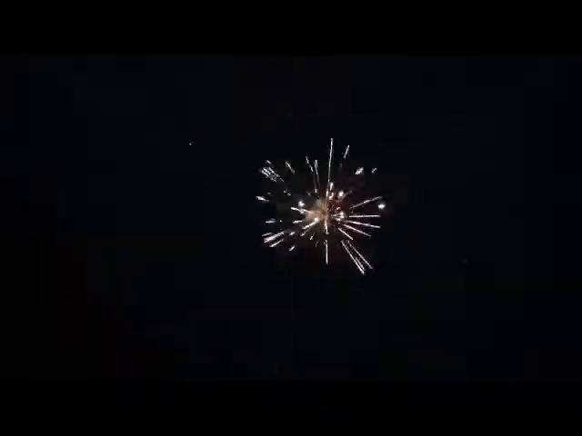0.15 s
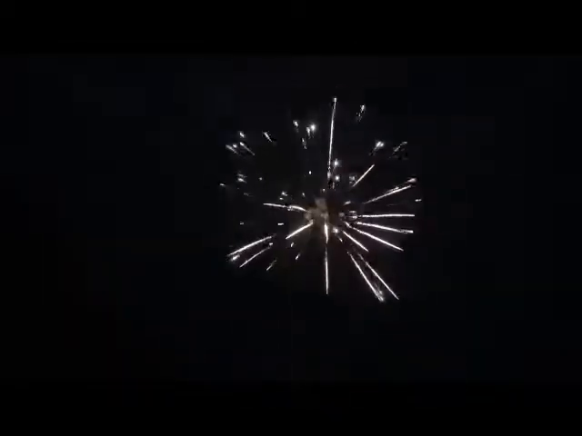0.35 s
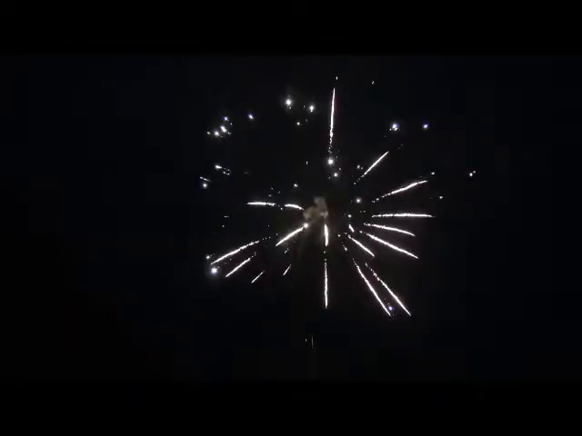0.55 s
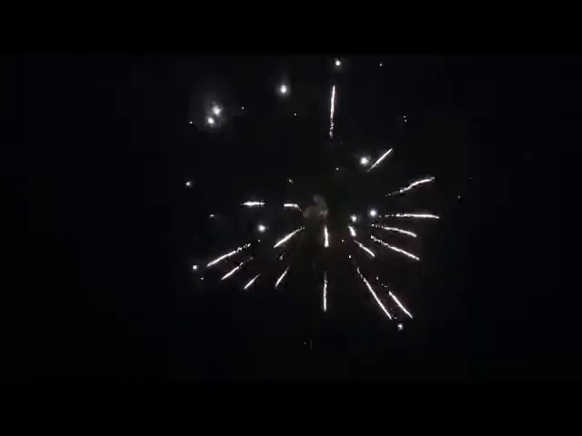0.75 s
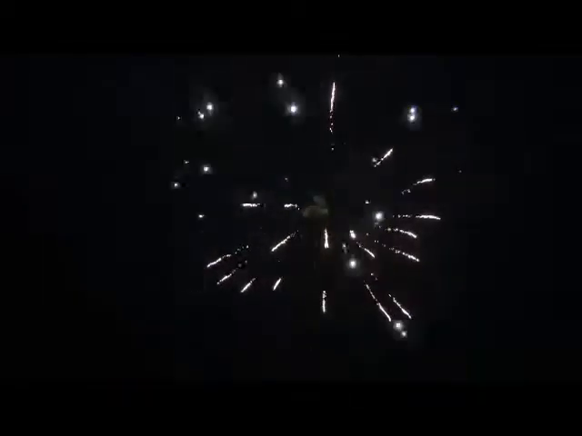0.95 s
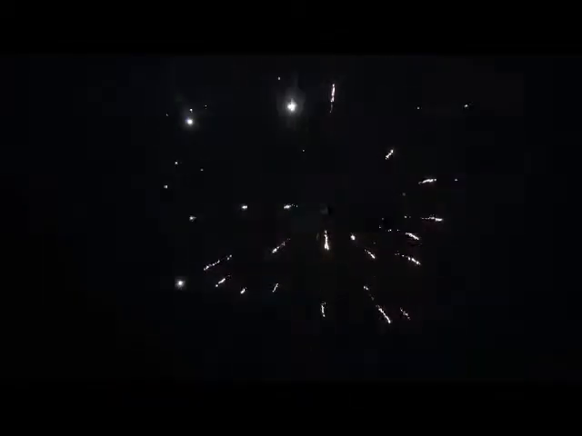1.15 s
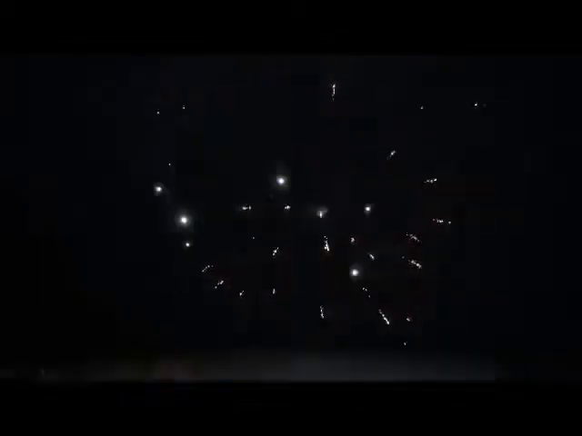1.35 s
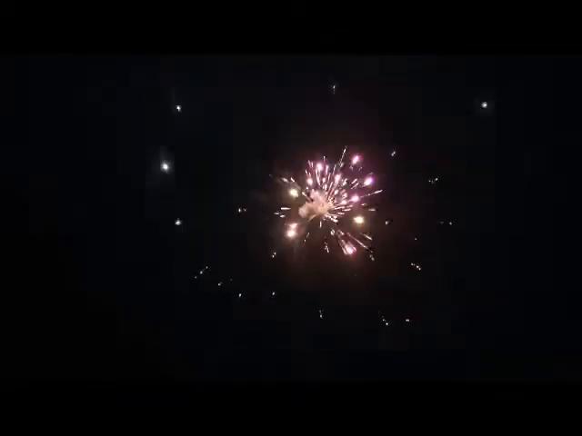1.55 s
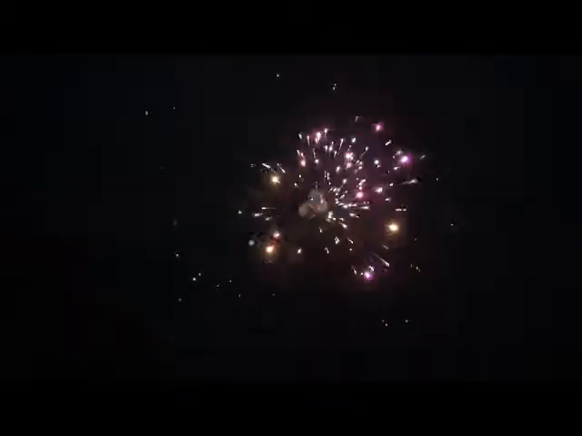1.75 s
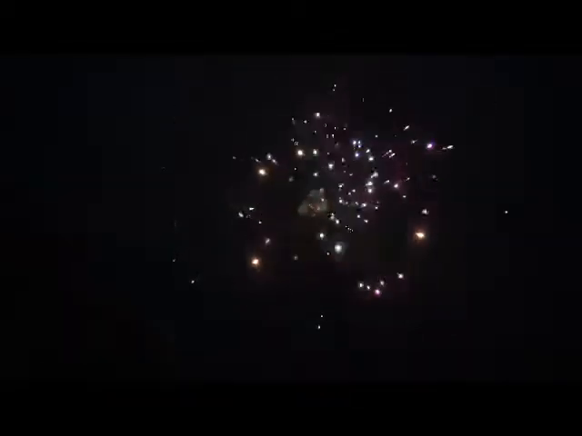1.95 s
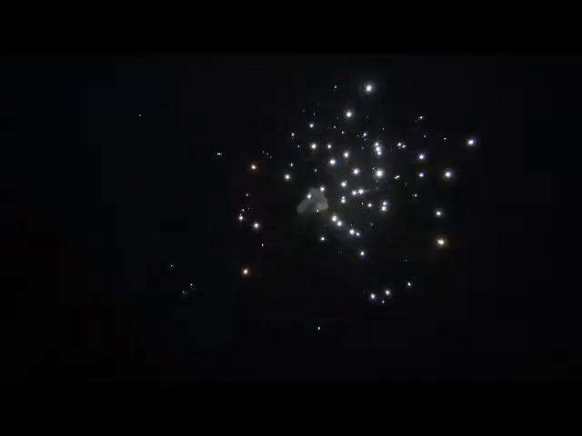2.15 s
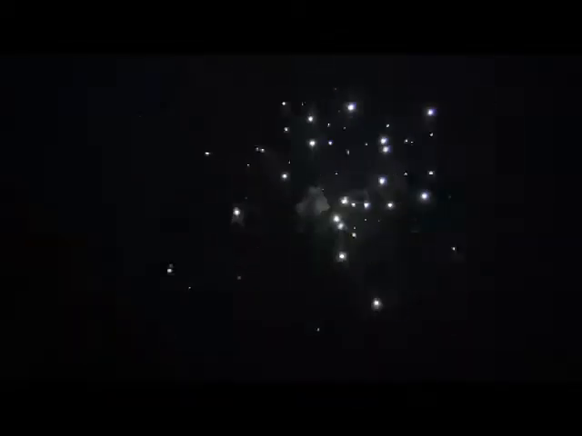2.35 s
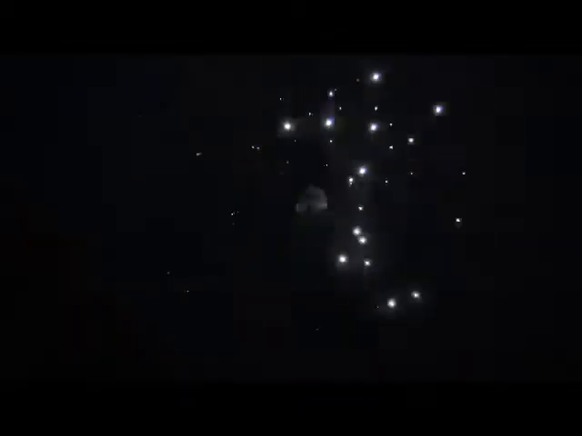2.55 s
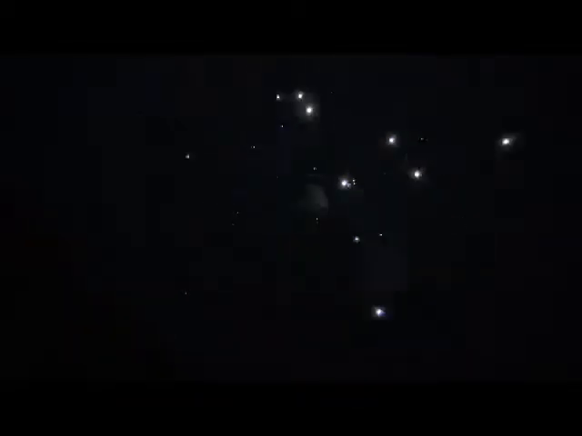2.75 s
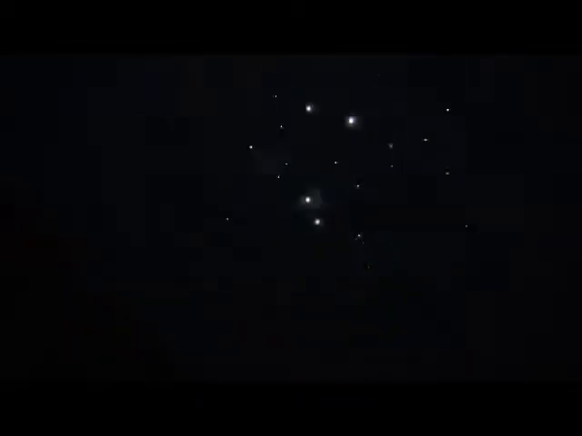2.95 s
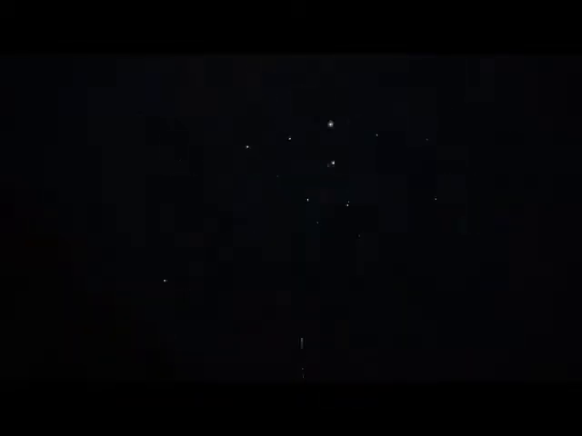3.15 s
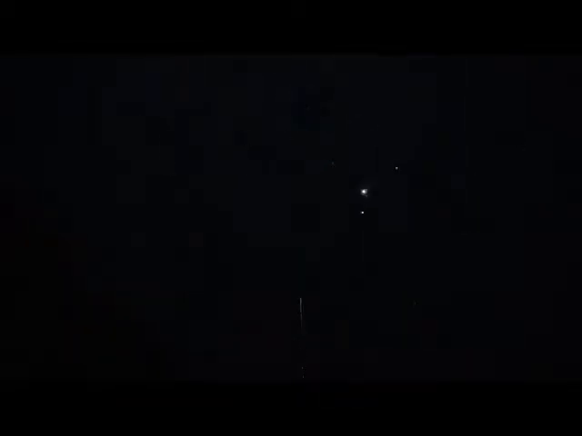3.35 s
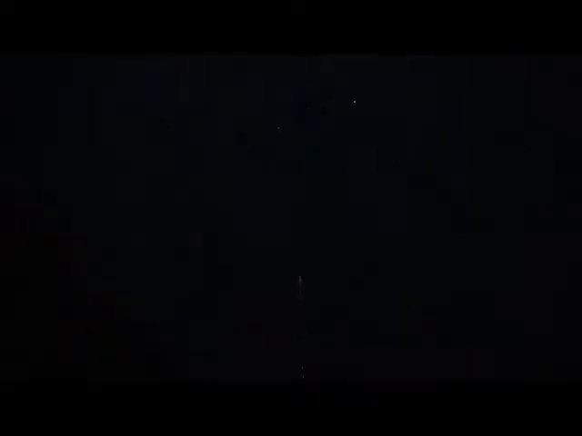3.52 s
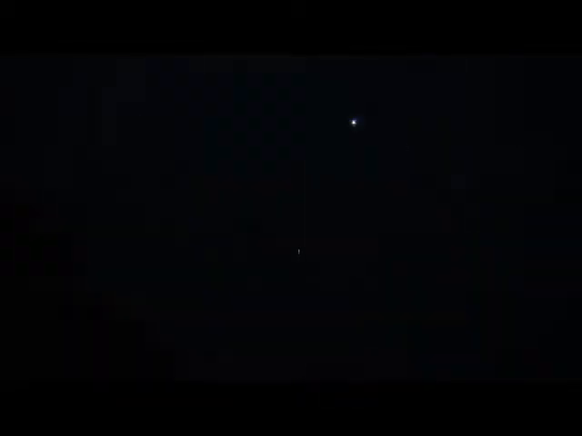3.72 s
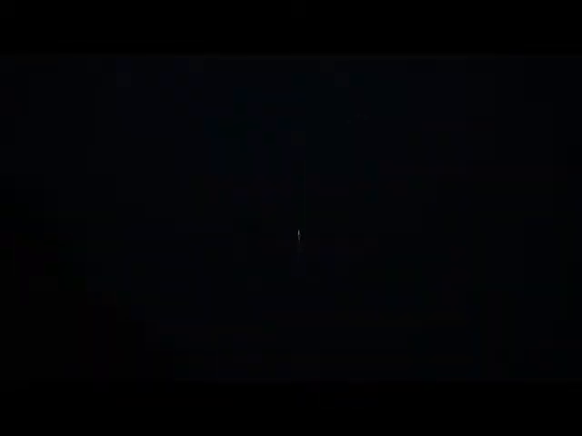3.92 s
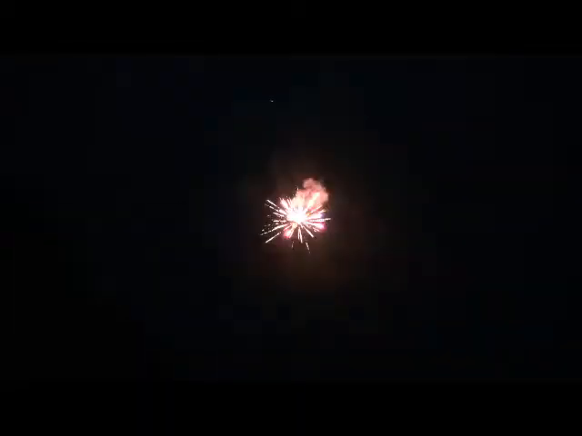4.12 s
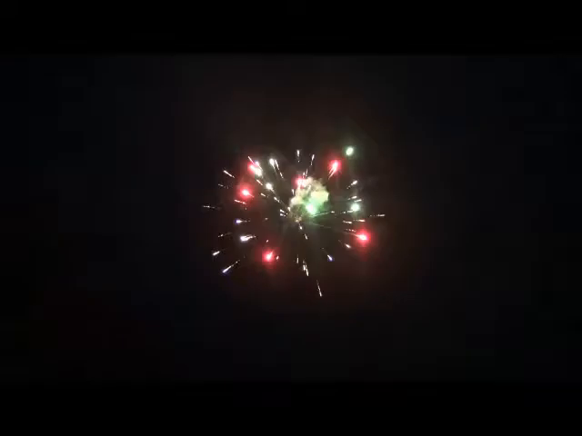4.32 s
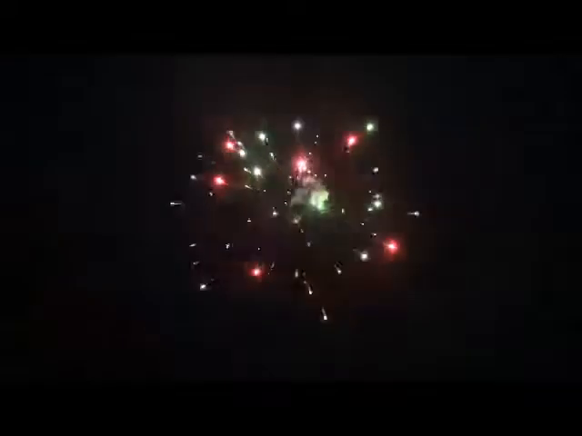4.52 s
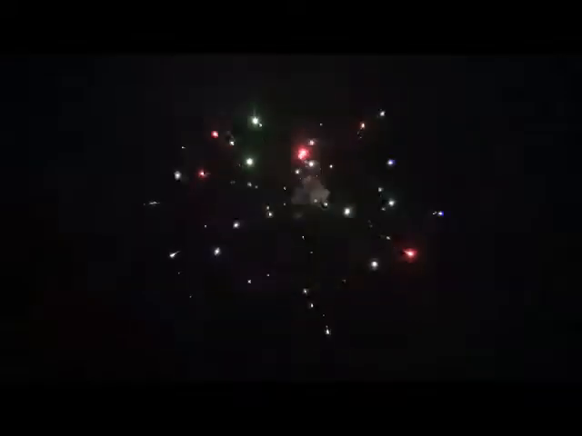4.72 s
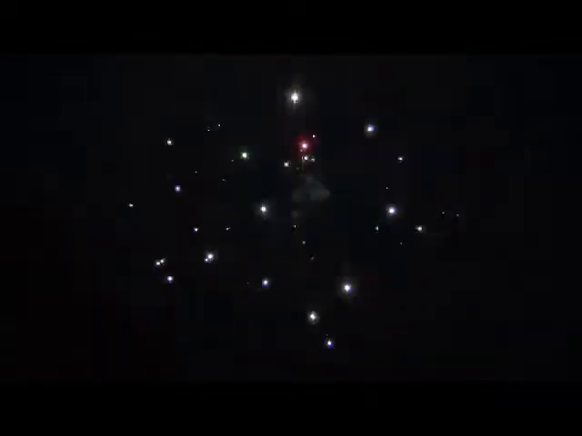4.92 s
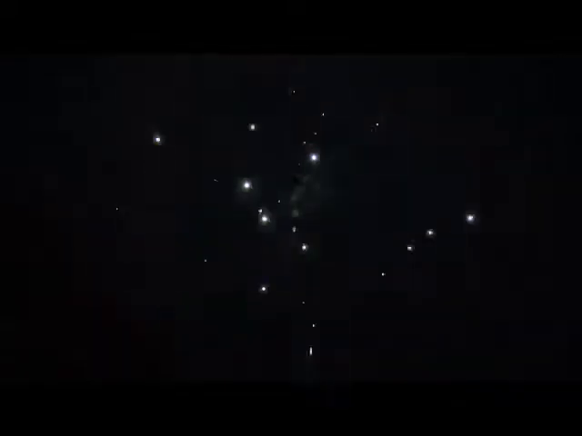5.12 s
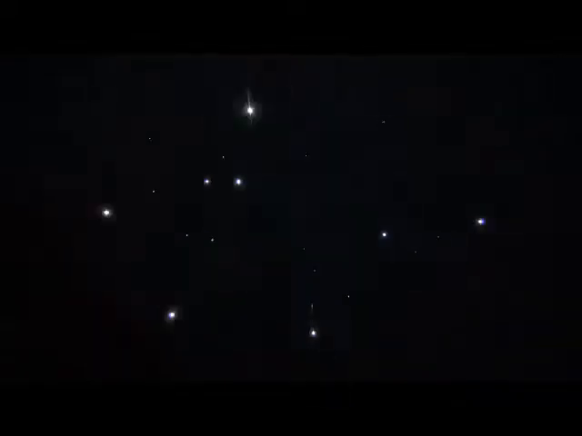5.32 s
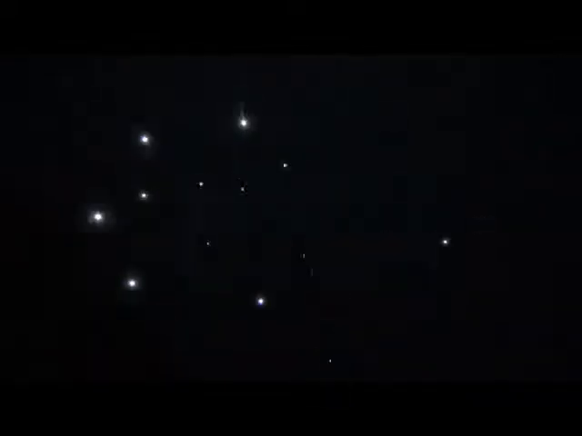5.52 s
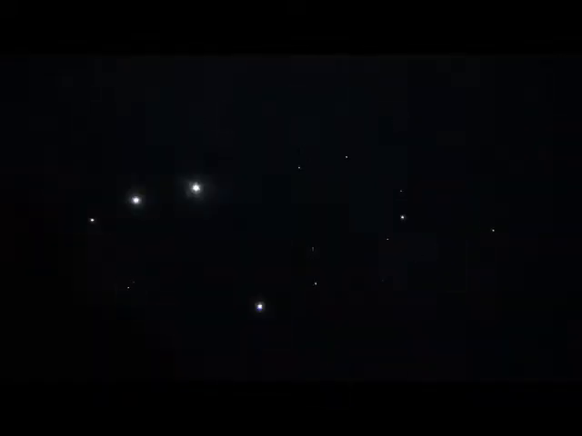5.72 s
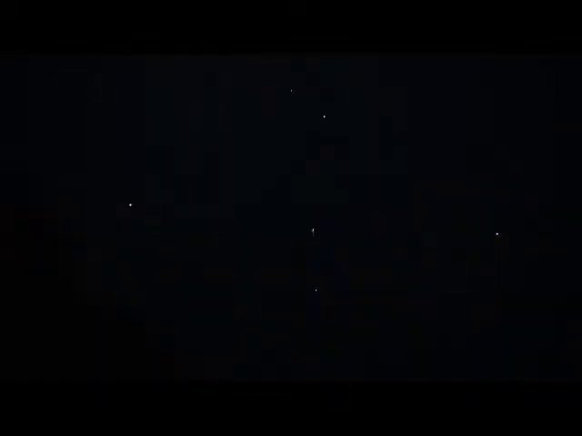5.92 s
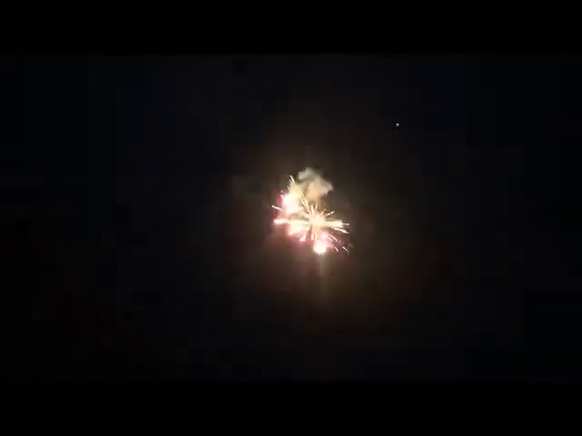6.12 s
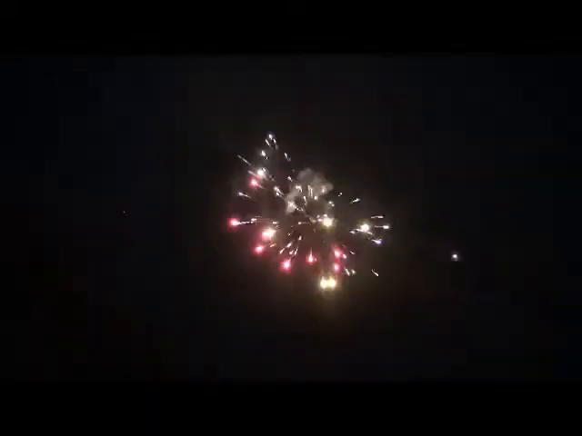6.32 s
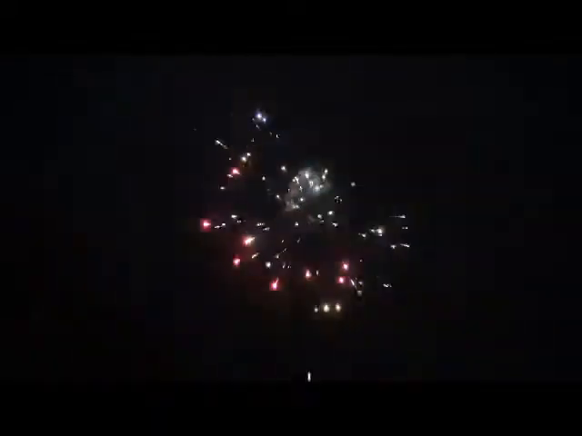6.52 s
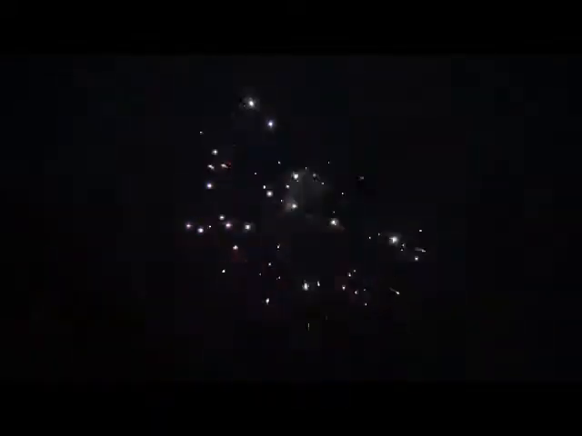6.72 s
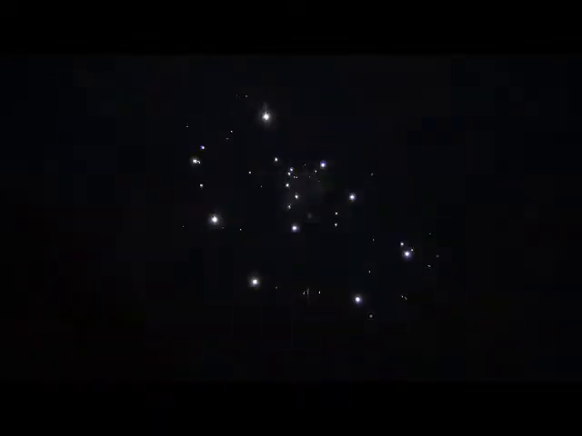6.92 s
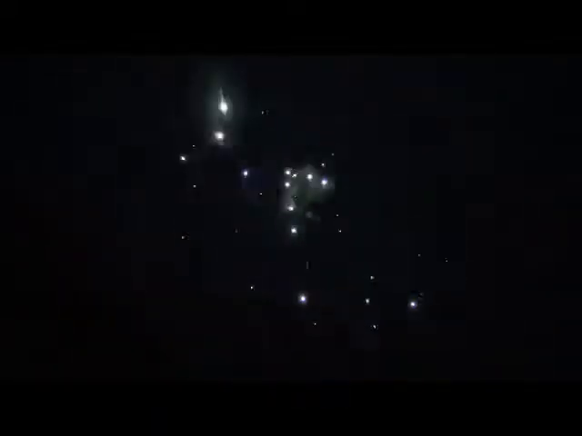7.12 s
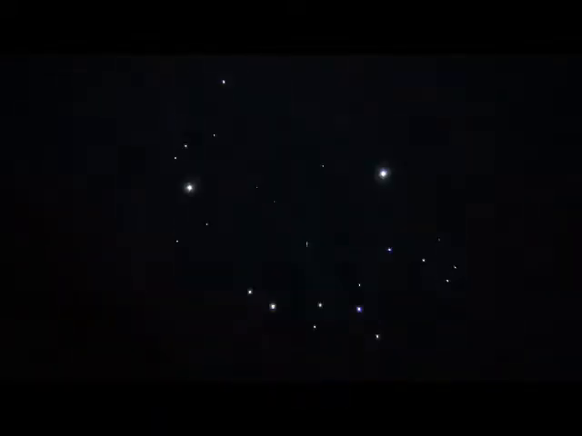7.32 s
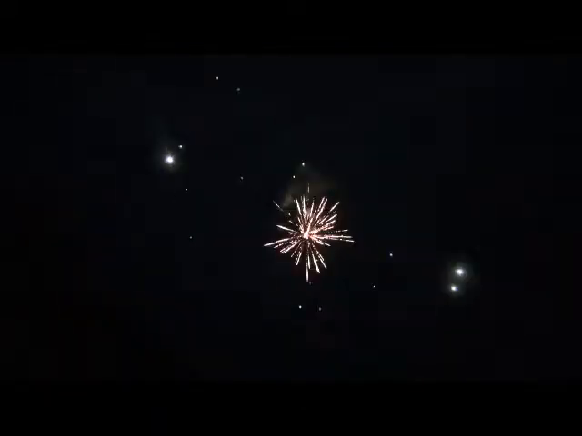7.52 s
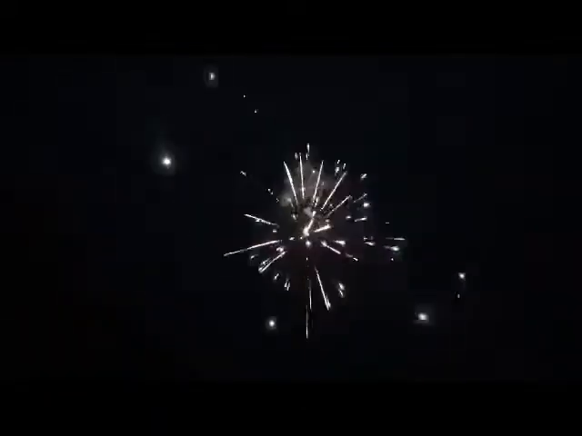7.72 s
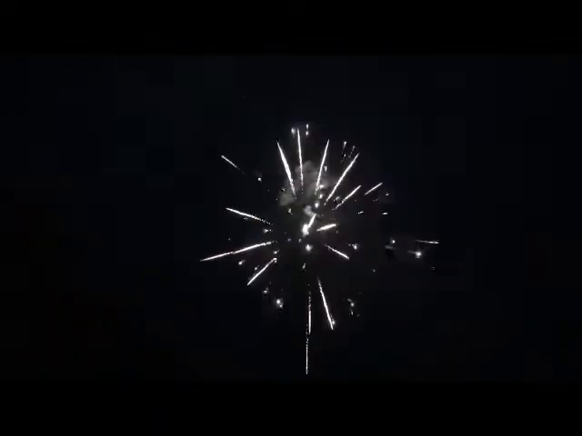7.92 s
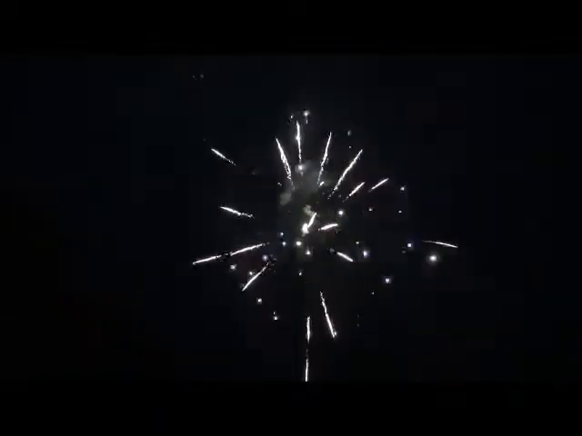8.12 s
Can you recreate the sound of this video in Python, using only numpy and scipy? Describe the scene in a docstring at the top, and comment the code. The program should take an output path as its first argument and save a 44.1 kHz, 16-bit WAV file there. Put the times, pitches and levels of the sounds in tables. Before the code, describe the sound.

Fireworks at night: five heavy overhead bangs and three drier mortar pops, each echoing off trees and houses into a long dulling roll over faint hiss.

```python
"""A quiet outdoor place at night: firework shells burst overhead and a mortar on the ground pops.
Each blast is a sharp pressure wave with its first reflections. Shaped noise makes the splash from
close trees and the long roll from far houses and hills, which the air dulls as it goes on.
Thin ticks and a soft hiss lie beneath. A limiter on each microphone flattens the loudest moments."""
import sys
import numpy as np
from scipy import signal
from scipy.fft import rfft, irfft, next_fast_len
from scipy.io import wavfile
from scipy.ndimage import uniform_filter1d, minimum_filter1d

SR = 44100
rng = np.random.default_rng(int(sys.argv[2]) if len(sys.argv) > 2 else 0)


def persist_wave(psi):
    """Save psi, clipped to +-1, as 16-bit WAV."""
    counts = np.round(np.clip(psi, -1, 1) * 32767).astype(np.int16)
    wavfile.write(sys.argv[1], SR, np.atleast_2d(counts).T)


N = 364266
TAIL = int(2.6 * SR)  # length of one explosion with its echoes, in samples
WAVE_SIZE = 4096  # length of a blast wave or a tick, in samples

# how strongly noise differs between the microphones, against what they share: (f/Hz, level/dB)
MICROPHONE_DIFFERENCE = [(200, -32), (2200, -19), (3500, -21.5), (5200, -4), (8000, 1.5), (10000, -3),
                         (11500, -20)]


def undb(db):
    """Turn decibels into gain."""
    return 10 ** (np.asarray(db) / 20)


def rfft_hz(size):
    """Frequency of each bin of a transform."""
    return np.arange(size // 2 + 1) * SR / size


def gains(colour, size):
    """Gain of a (f/Hz, level/dB) colour at each bin, joined by straight lines over log frequency."""
    hz, db = np.transpose(colour)
    bin_db = np.interp(np.log(rfft_hz(size) + 1), np.log(hz), db)
    return undb(bin_db)


def tint(x, colour):
    """Give a sound a colour by scaling each of its frequencies."""
    size = next_fast_len(len(x))
    spectrum = rfft(x, size) * gains(colour, size)
    return irfft(spectrum, size)[:len(x)]


def unit(x):
    """Scale to an rms of 1."""
    return x / np.std(x)


def lowpass(x, hz, order=2):
    """Dull a sound above hz, as a soft surface does."""
    sos = signal.butter(order, min(hz, .45 * SR), fs=SR, output="sos")
    return signal.sosfilt(sos, x)


def add(out, x, s):
    """Mix x into out from time s, cutting what falls outside."""
    start = int(round(s * SR))
    lo = max(start, 0)
    hi = min(start + x.shape[-1], out.shape[-1])
    if hi > lo:
        out[..., lo:hi] += x[..., lo - start:hi - start]


def lean(pair, share):
    """Tip a stereo sound towards the right: half the difference off the left, half onto the right."""
    # how much louder the right microphone is at a share of 1: (f/Hz, level/dB)
    right_lead = [(60, -.3), (130, .7), (260, 3), (550, 3.8), (1200, 3.3), (2500, 1.8), (5000, 2.2),
                  (9000, .4)]
    tipped = []
    for x, sign in zip(pair, (-1, 1)):
        colour = [(hz, sign * share * db / 2) for hz, db in right_lead]
        tipped.append(tint(x, colour))
    return np.array(tipped)


def night():
    """Night air and microphone hiss: steady coloured noise, partly different in each microphone."""
    # colour of the hiss: (f/Hz, level/dB)
    hiss_colour = [(25, -32), (90, -17), (200, -1.5), (480, 1.5), (1400, -8), (3000, -26), (6000, -35),
                   (11000, -40.5), (12000, -29), (15500, -36)]
    level_db = -53.5  # rms of the shared part, before the lean
    mid = unit(tint(rng.standard_normal(N), hiss_colour))
    side = unit(tint(rng.standard_normal(N), hiss_colour))
    side = tint(side, MICROPHONE_DIFFERENCE)
    return undb(level_db) * lean([mid + side, mid - side], share=.3)


def ticks(fade_s=.0008):
    """Tiny high snaps: noise with its bass thinned out that dies away within a few ms."""
    # thin ticks: (t/s, level/dB)
    tick_times = [(2.1130, -41), (2.1245, -43), (2.7990, -31), (2.8112, -24), (3.492, -49), (4.8670, -37)]
    out = np.zeros(N)
    t = np.arange(WAVE_SIZE) / SR
    for s, db in tick_times:
        thin_noise = np.diff(rng.standard_normal(WAVE_SIZE + 1))  # differences favour the treble
        snap = thin_noise * np.exp(-t / fade_s)
        add(out, undb(db) * snap / 2, s)
    return out


def shock(colour):
    """A pressure wave with its energy packed towards the front (minimum phase), peak 1."""
    cepstrum = irfft(np.log(gains(colour, WAVE_SIZE)))
    # fold the second half onto the first, so that nothing sounds ahead of the front
    cepstrum[1:WAVE_SIZE // 2] *= 2
    cepstrum[WAVE_SIZE // 2 + 1:] = 0
    wave = irfft(np.exp(rfft(cepstrum)))
    return -wave / np.abs(wave).max()


def swing(x, turn_hz):
    """An all-pass: the sharp front comes first, the bass swings in behind it the other way."""
    g = np.tan(np.pi * turn_hz / SR)
    pole = (1 - g) / (1 + g)
    return signal.lfilter([pole, -1], [1, -pole], x)


def tube(wave):
    """The blast rings the mortar tube: a low boom and a hollow knock added to the wave."""
    # resonances of the mortar tube: (f/Hz, width/Hz, level/dB)
    resonances = [(147.7, 47, 7.5), (864, 260, -9)]
    ringing = wave.copy()
    for hz, width_hz, db in resonances:
        b, a = signal.iirpeak(hz, hz / width_hz, fs=SR)
        ringing += undb(db) * signal.lfilter(b, a, wave)
    return ringing


def reflect(wave, paths):
    """The shock and its first reflections off ground and walls; soft surfaces dull it."""
    out = np.zeros(TAIL)
    for delay_s, db, edge_hz in paths:
        add(out, undb(db) * lowpass(wave, edge_hz), delay_s)
    return out


def wander(per_s):
    """Random levels joined by straight lines, per_s new ones a second."""
    t = np.arange(TAIL) / SR
    return np.interp(t * per_s, np.arange(TAIL), rng.standard_normal(TAIL))


def scatter(colour, lumpy_db, lumps_per_s, surge_db=1.14, surges_per_s=22):
    """Countless small echoes: noise in lumps and surges, most different between microphones up high."""
    level_db = lumpy_db * wander(lumps_per_s) + surge_db * wander(surges_per_s)
    strength = undb(level_db)
    mid = unit(tint(strength * rng.standard_normal(TAIL), colour))
    side = unit(tint(strength * rng.standard_normal(TAIL), colour))
    side = tint(side, MICROPHONE_DIFFERENCE)
    return np.array([mid + side, mid - side])


def air(x, loss_db=14, knee_hz=5000, power=2.2):
    """Air takes loss_db a second at the knee and more above it, so late echoes are dull."""
    hz, s, frames = signal.stft(x, SR, nperseg=WAVE_SIZE // 8)
    lost_db = loss_db * np.outer((hz / knee_hz) ** power, s)
    return signal.istft(frames * undb(-lost_db), SR)[1][:, :TAIL]


def swell(db, rise_s, hold_s, fade_db_per_s):
    """Diffuse echoes build as the blast reaches more surfaces, hold, then fade at a steady rate."""
    t = np.arange(TAIL) / SR
    rise = np.sqrt(np.minimum(t / rise_s, 1))
    fading_s = np.maximum(t - rise_s - hold_s, 0)
    return rise * undb(db - fade_db_per_s * fading_s)


def with_echoes(diffuse, echoes, linger=1.9):
    """Each large reflector adds energy: a swell that dies away linger times slower than it builds."""
    t = np.arange(TAIL) / SR
    power = diffuse ** 2
    for delay_s, db, spread_s in echoes:
        width_s = np.where(t < delay_s, spread_s, linger * spread_s)
        echo = undb(db) * np.exp(-((t - delay_s) / width_s) ** 2 / 2)
        power = power + echo ** 2
    return np.sqrt(power)


def bang(event, direct, splash_colour, roll_colour, splash_gain, roll_gain, rightward, bass_hz=330):
    """One explosion: blast, bright splash from close by, long roll from far away on the right."""
    _, blast_db, splash_db, roll_db, bass_db = event
    boom_s = .34  # how long the extra bass of a big charge lasts
    t = np.arange(TAIL) / SR
    splash = splash_gain * scatter(splash_colour, lumpy_db=2.0, lumps_per_s=900)
    roll = roll_gain * air(scatter(roll_colour, lumpy_db=1.4, lumps_per_s=600))
    # a bigger charge booms more in the early echoes from the houses, nearly alike in both microphones
    boom_fade = np.sqrt(np.maximum(1 - (t / boom_s) ** 2, 0))
    boom = (undb(bass_db) - 1) * boom_fade * lowpass(roll, bass_hz, order=1)
    near = undb(blast_db) * direct + undb(splash_db) * splash + boom
    far = undb(roll_db) * roll
    return lean(near, rightward) + lean(far, 0.95)


def lifts():
    """The mortar pops at ground level: a dry double knock, then mostly the answer of the houses."""
    # mortar pops: (t/s, blast level/dB, splash level/dB, roll level/dB, extra bass level/dB)
    pops = [(2.7791, 4.5, 1.5, .5, 1), (4.8346, -1, -4, -4.5, 0), (7.9997, 1.5, -1, 0, 0)]
    # ways from the mortar to the microphone: (delay t/s, level/dB, treble edge f/Hz)
    paths = [(0, 3, 8000), (0.0114, 4.5, 3500), (0.029, -1, 600), (.0685, -9, 5010)]
    # colours of the blast, the splash, and the roll before the air dulls it: (f/Hz, level/dB)
    wave_colour = [(25, -19), (60, -5), (130, 0.5), (220, 2), (400, -13), (850, 8), (1500, -4), (3000, -18),
                   (5500, -16), (8000, -40), (15000, -50)]
    splash_colour = [(25, -28), (130, -2), (400, -5), (900, -1), (2000, 0), (3500, -9.5), (5500, -15),
                     (8000, -27), (11000, -26), (12500, -20.5), (15500, -33)]
    roll_colour = [(25, -35), (110, -15), (400, -4.5), (750, 0.5), (1500, -5.5), (2000, -5.5),
                   (2900, -17.5), (4500, -22), (8000, -38), (15000, -26)]
    # echoes from close trees, and from rows of houses: (delay t/s, level/dB, spread t/s)
    trees = [(.072, -36, .014)]
    houses = [(.29, -32.5, .052), (.56, -42, .1)]
    out = np.zeros((2, N))
    wave = tube(swing(shock(wave_colour), turn_hz=970))
    blast = undb(-15) * reflect(wave, paths)
    splash = with_echoes(swell(db=-35, rise_s=.004, hold_s=.005, fade_db_per_s=100), trees)
    roll = with_echoes(swell(db=-40.5, rise_s=.07, hold_s=.15, fade_db_per_s=17), houses)
    for event in pops:
        pop = bang(event, blast, splash_colour, roll_colour, splash, roll, rightward=0.57)
        add(out, pop, event[0])
    return out


def bursts():
    """Shells burst overhead: the whole landscape hears them, so the splash is strong and the roll long."""
    # shell bursts, the first one already rolling away at the start:
    # (t/s, blast level/dB, splash level/dB, roll level/dB, extra bass level/dB)
    shells = [(-1.27, 0, 0, -2.5, 0), (.2511, -.8, -2.2, 0, 5), (1.6548, .2, -.9, 0, 2.5),
              (4.3203, 4, 3.6, .3, 8), (6.2937, -.3, -2.6, 0, 1.5), (7.6957, 1.5, 1.5, 1.5, 5.5)]
    # ways from a shell to the microphone: (delay t/s, level/dB, treble edge f/Hz)
    paths = [(0, 0, 5000), (.0051, 2.5, 15500), (.0086, -6, 900), (.0152, -6, 900), (0.0229, -4.5, 1010),
             (.0308, 0.5, 1200), (.0390, -8, 7000)]
    # colours of the blast, the splash, and the roll before the air dulls it: (f/Hz, level/dB)
    wave_colour = [(25, -33), (60, -23), (120, -10.5), (200, -2), (330, 5), (550, 2), (900, -8),
                   (2000, -20.5), (5000, -26.5), (9000, -38), (13000, -31), (15500, -38)]
    splash_colour = [(25, -31), (60, -20.5), (150, -2), (280, 2), (550, -3.5), (850, -10.5), (1800, -13.5),
                     (3800, -23.5), (6500, -34.5), (10800, -40), (12200, -32), (15500, -43)]
    roll_colour = [(25, -45), (60, -24), (100, -10.5), (170, -4), (300, -0.33), (520, 1), (850, -7.5),
                   (1200, -7.5), (2000, -15), (4000, -25.5), (7000, -37.5), (10800, -38), (12200, -29),
                   (15500, -53)]
    # echoes from close trees, and from houses and a far hill: (delay t/s, level/dB, spread t/s)
    trees = [(.052, -22, .009), (.097, -25, .007)]
    houses = [(.03, -26, .006), (.135, -31, .022), (.258, -26.5, .021), (1.32, -43.5, .09)]
    out = np.zeros((2, N))
    wave = swing(shock(wave_colour), turn_hz=600)
    blast = undb(-12.5) * reflect(wave, paths)
    splash = with_echoes(swell(db=-25, rise_s=.012, hold_s=.1, fade_db_per_s=70), trees)
    roll = with_echoes(swell(db=-26.1, rise_s=.28, hold_s=.125, fade_db_per_s=20.5), houses)
    for event in shells:
        burst = bang(event, blast, splash_colour, roll_colour, splash, roll, rightward=0.28)
        add(out, burst, event[0])
    return out


def scene():
    """The quiet night, thin ticks, pops from the mortar on the right and bursts overhead."""
    return night() + ticks() + lifts() + bursts()


def limiter(x, ceiling_db=-10.0, recover_db=120, ahead_s=0.0026):
    """Looks ahead, ducks under each peak and recovers at recover_db a second."""
    over_db = np.maximum(20 * np.log10(np.abs(x) + 1e-9) - ceiling_db, 0)
    ramp_db = recover_db * np.arange(N) / SR
    duck_db = np.maximum.accumulate(over_db + ramp_db) - ramp_db
    span = 2 * int(ahead_s * SR) + 1
    gain = minimum_filter1d(undb(-duck_db), span)  # already down when the peak arrives
    return x * uniform_filter1d(gain, span)  # averaged so that it moves smoothly


def record(dry):
    """Each microphone has its own limiter; then everything above top_hz is cut."""
    top_hz = 15800
    limited = np.array([limiter(x) for x in dry])
    top_cut = signal.ellip(10, .2, 80, top_hz, fs=SR, output="sos")
    return signal.sosfilt(top_cut, limited)


dry = scene()
out = record(dry)
persist_wave(out)
```